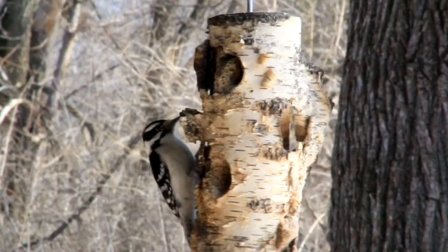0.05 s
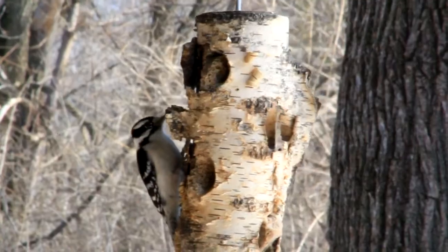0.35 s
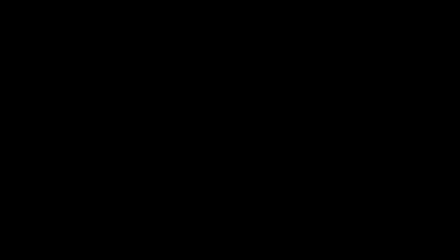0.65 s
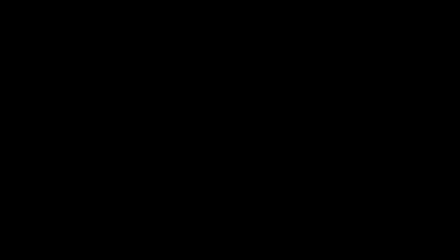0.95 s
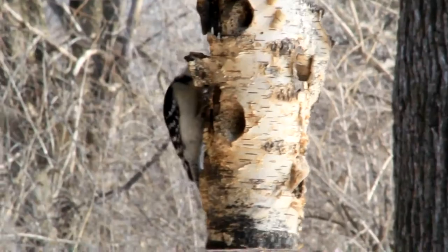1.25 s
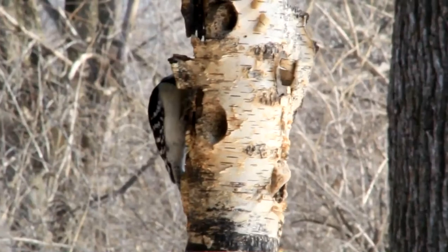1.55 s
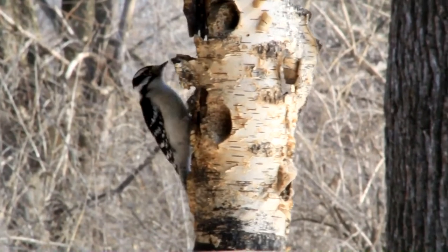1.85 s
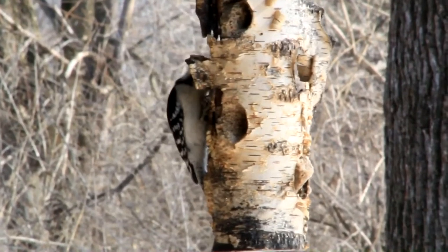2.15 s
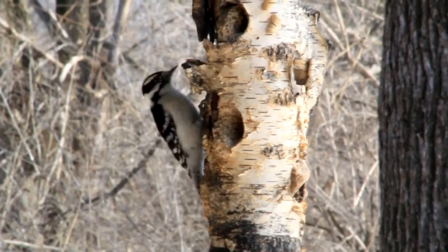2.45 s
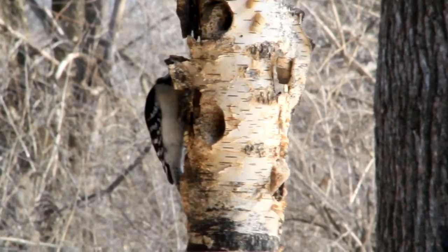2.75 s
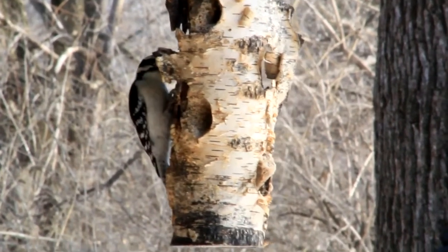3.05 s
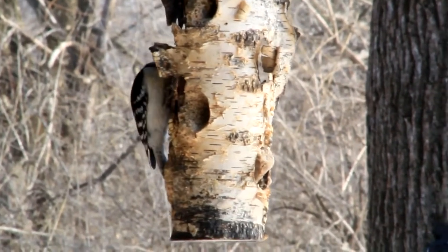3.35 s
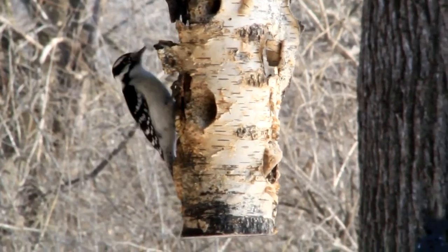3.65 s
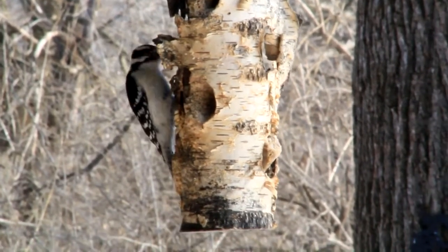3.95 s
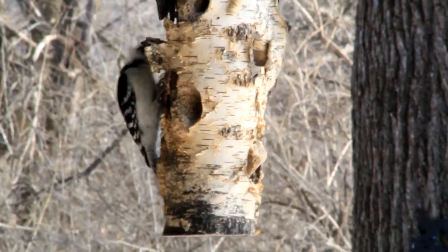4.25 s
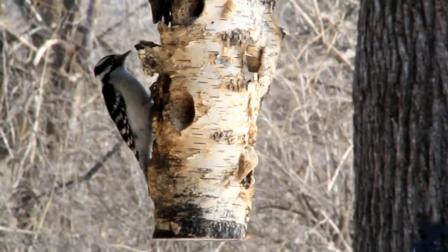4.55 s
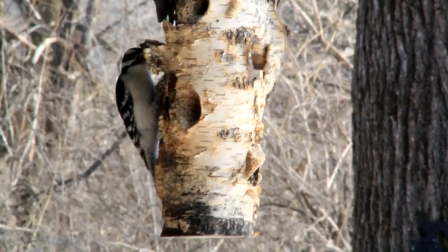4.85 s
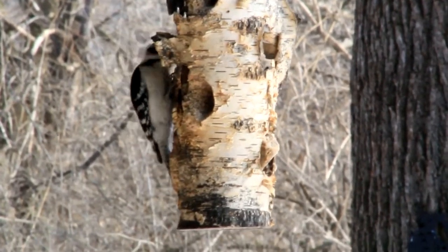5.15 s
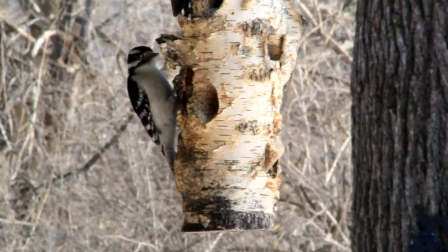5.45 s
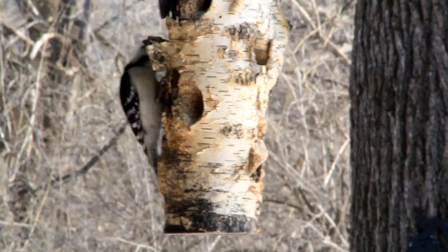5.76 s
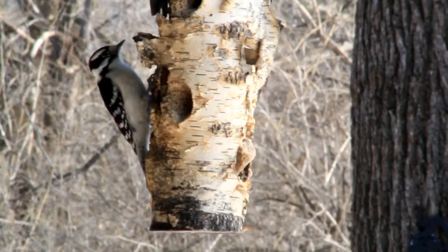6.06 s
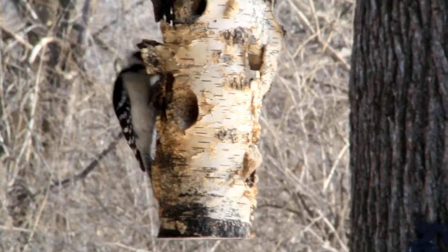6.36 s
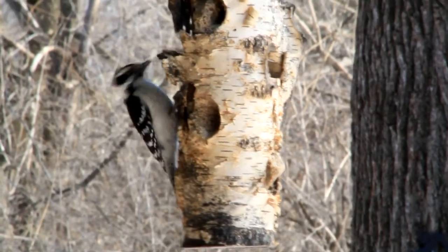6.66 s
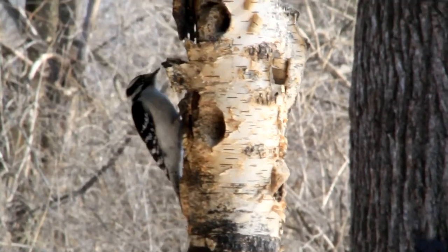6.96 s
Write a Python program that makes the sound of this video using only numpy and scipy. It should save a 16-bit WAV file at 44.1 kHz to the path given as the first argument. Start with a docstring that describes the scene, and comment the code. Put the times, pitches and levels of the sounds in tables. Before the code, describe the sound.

Light, uneven taps and clicks come from a woodpecker working at a birch log outdoors, over a soft, constant hiss of wind and a far rumble. Early on, a faint distant whistle falls and something dry snaps nearby. After a short, dead silence, the ticking and fine patter resume, slightly smeared by close echoes, with occasional soft plinks and one more small snap as the breeze continues.

```python
"""A small woodpecker works at a hanging birch-log feeder in late-winter woods. Crisp ticks and patter
(bits of bark, perhaps drips of meltwater) are each a crack plus a short ring, smeared by close echoes.
A steady breeze hisses in the branches and rustles dry stems over a far rumble. One thin falling whistle,
a few faint plinks and two dry snaps sit on top. Early on, the sound stops dead for 0.6 s."""
import sys
import numpy as np
from scipy import signal
from scipy.fft import rfft, irfft
from scipy.io import wavfile

SR = 44100
rng = np.random.default_rng(int(sys.argv[2]) if len(sys.argv) > 2 else 0)


def put_to_file(sound):
    """Save the sound as 16-bit audio at rate SR, in the file named by the first command-line argument."""
    columns = np.atleast_2d(sound).T  # one column per channel
    safe = np.clip(columns, -1, 1)
    whole_steps = np.round(safe * 32767)
    wavfile.write(sys.argv[1], SR, whole_steps.astype(np.int16))


N = 317961
TIME = np.arange(N) / SR


def from_db(db):
    """Turns decibels into a number to multiply a sound by."""
    return 10 ** (np.asarray(db) / 20)


def rms_one(x):
    """Scales a sound so that its average strength (rms) is 1."""
    return x / np.sqrt(np.mean(x ** 2) + 1e-20)


def in_time(rows):
    """Joins a table's points with straight lines: one curve for each column after the time."""
    times, *columns = np.transpose(rows)
    return [np.interp(TIME, times, column) for column in columns]


def add(out, start_s, sound):
    """Mixes a sound in at the given time."""
    at = int(np.clip(start_s * SR, 0, N - 1))
    out[at:at + len(sound)] += sound[:N - at]


def coloured(noise, spectrum):
    """Makes some pitches of a noise louder than others; the result has strength 1."""
    hz, db = np.transpose(spectrum)
    bins_hz = np.maximum(np.fft.rfftfreq(N, 1 / SR), 1)
    gain = from_db(np.interp(np.log(bins_hz), np.log(hz), db))
    return rms_one(irfft(rfft(noise) * gain, N))


def drift(rate_hz):
    """A smooth random wobble of strength 1; a higher rate wobbles faster."""
    noise = rng.standard_normal(N + SR)
    return rms_one(signal.sosfilt(signal.butter(2, rate_hz, fs=SR, output="sos"), noise)[SR:])


def band(x, hz, octaves):
    """Keeps only the pitches in a band of the given width around hz."""
    half = 2 ** (octaves / 2)
    return signal.sosfilt(signal.butter(2, [hz / half, hz * half], "band", fs=SR, output="sos"), x)


# Tone colour of the far rumble: (pitch [Hz], relative level [dB])
RUMBLE_COLOUR = [(20, -12), (45, -1.5), (70, -5), (130, -0.5), (280, -2), (480, 0.5), (900, -4.5),
                 (2000, -13.5), (16000, -62.5)]
# Tone colour of the air rushing through branches: (pitch [Hz], relative level [dB])
RUSH_COLOUR = [(100, -25), (450, -10), (850, 1.5), (1400, 1.5), (2000, -4.5), (2500, -4.5), (3000, -10.5),
               (3500, -8.5), (6000, -35), (16000, -47.5)]
# Tone colour of the rustling stems: (pitch [Hz], relative level [dB])
RUSTLE_COLOUR = [(1500, -14.5), (3000, 0), (3500, -7.5), (4200, 0.5), (6000, -2), (8500, -6.5),
                 (11000, -11), (13500, -14), (16000, -12.5)]
# How the breeze swells and sinks: (time [s], rush change [dB], rustle change before rustle_share [dB])
BREEZE_SWELLS = [(0.06, 2.5, 6), (0.34, 1.6, -1.3), (1.46, 0.5, 3.7), (1.62, 0.2, 4), (1.82, -0.5, 2),
                 (2.94, 0.25, 2.5), (4.14, -0.7, -1), (4.38, -0.1, 0.8), (4.58, -1, 1.5), (4.74, 0.8, 2.5),
                 (5.1, -2, -3.5), (5.7, 2, 4.5), (5.78, -0.8, -0.5), (6.34, 0.9, 3.3), (6.58, -2.8, -5),
                 (6.74, 2.2, 0), (7.02, -3, 1.5), (7.14, 0.5, 0)]


def breeze(rumble_db=-53.0, rush_db=-49.0, rustle_db=-55.5, rustle_share=0.6,
           sway_db=0.74, sway_hz=5, flutter_db=1.9, flutter_hz=25, grain_db=2.0):
    """Over a steady far rumble, air rushes in branches and rustles dry stems; those two sway together."""
    rush_swell, rustle_swell = in_time(BREEZE_SWELLS)
    sway = sway_db * drift(sway_hz)
    rumble = from_db(rumble_db) * coloured(rng.standard_normal(N), RUMBLE_COLOUR)
    rush = from_db(rush_db + rush_swell + sway) * coloured(rng.standard_normal(N), RUSH_COLOUR)
    grains = rng.standard_normal(N) * from_db(grain_db * rng.standard_normal(N))
    flutter = flutter_db * drift(flutter_hz)
    rustle_level = from_db(rustle_db + rustle_share * rustle_swell + sway + flutter)
    rustle = rustle_level * coloured(grains, RUSTLE_COLOUR)
    return rumble + rush + rustle


def burst(rise_s, crack_db, crack_s, early_s=0.022, early_fall_db=4.5, tail_s=0.24, grain_db=6.0):
    """A brief crackle and its close echoes, which fade faster once early_s has passed."""
    t = np.arange(SR // 8) / SR
    tail_db = -60 * np.maximum(t - early_s, 0) / tail_s
    echoes = from_db(tail_db - early_fall_db * t / early_s)
    crack = from_db(crack_db) * np.exp(-t / crack_s)
    loudness = (1 - np.exp(-t / rise_s)) * (echoes + crack)
    grains = rng.standard_normal(len(t)) * from_db(grain_db * rng.standard_normal(len(t)))
    return loudness * grains


def tick(crack_db, ring_db, hz, octaves, low_hz=800, high_hz=7000, split_hz=4000, edge_db=-4.0):
    """One small thing is struck: a noisy crack plus its own short ring."""
    # the bright edge comes at once, the woody body builds up behind it
    edge = burst(rise_s=0.00088, crack_db=5.5, crack_s=0.0037)
    edge = signal.lfilter(*signal.butter(2, split_hz, "high", fs=SR), edge)
    body = burst(rise_s=0.009, crack_db=-12.0, crack_s=0.011)
    body = signal.lfilter(*signal.butter(2, split_hz, fs=SR), body)
    soften = signal.butter(1, [low_hz, high_hz], "band", fs=SR)
    crack = signal.lfilter(*soften, body + from_db(edge_db) * edge)
    crack = signal.lfilter(*soften, crack)
    ring = band(burst(rise_s=0.0017, crack_db=2.5, crack_s=0.00598), hz, octaves)
    head = SR // 36   # the first 28 ms set the level
    return from_db(crack_db) * crack / np.std(crack[:head]) + from_db(ring_db) * ring / np.std(ring[:head])


# Woody knocks ring over a wide band, small high ticks a narrow one: (pitch [Hz], width [octaves])
RING_WIDTHS = [(1000, 1.03), (2700, 2.06), (4500, 0.62), (9000, 0.5)]
# The louder ticks, before the gains below: (time [s], crack level [dB], ring level [dB], pitch [Hz])
FEEDER_TICKS = [(0.015, -46, -53, 9800), (0.064, -47, -51, 5560), (0.114, -49, -47, 1410),
                (0.191, -45, -45, 4450), (0.472, -44, -52, 5100), (0.561, -47, -55, 6500),
                (0.614, -54, -53, 5400), (1.258, -62, -47.5, 7200), (1.318, -58, -54, 1600),
                (1.358, -54, -54.5, 9000), (1.539, -42, -52.5, 6340), (1.633, -50, -51, 1200),
                (1.785, -49.5, -53.5, 1400), (1.955, -48, -46.5, 3270), (2.165, -51, -45, 4770),
                (2.265, -44.5, -53, 1800), (2.366, -45, -46.5, 2620), (2.539, -50, -45.5, 1050),
                (2.598, -53, -48.5, 6300), (2.609, -43.5, -54, 5670), (2.72, -57, -46.5, 2450),
                (2.827, -57, -52, 6100), (2.871, -46, -45.5, 1000), (2.902, -44.5, -44.5, 5600),
                (2.958, -46, -49, 5900), (3.019, -58, -53.5, 6700), (3.117, -46.5, -48.5, 980),
                (3.18, -47, -57, 5430), (3.264, -55, -49, 1650), (3.349, -49, -58, 4900),
                (3.394, -49.5, -58, 8900), (3.911, -55, -44.5, 2750), (4.02, -46, -53, 925),
                (4.214, -48, -48.5, 850), (4.306, -62, -48.5, 1710), (4.374, -46.5, -48.5, 2620),
                (4.43, -40.5, -49.5, 1590), (4.657, -46.5, -53, 4900), (4.742, -60, -55, 8200),
                (4.821, -45, -47, 6640), (4.926, -46, -56, 900), (5.017, -50, -61, 11000),
                (5.041, -48.5, -49, 1770), (5.161, -50, -49, 5600), (5.192, -50, -53.5, 7400),
                (5.233, -49, -50, 1700), (5.272, -47.5, -58, 9400), (5.406, -52, -48.5, 1980),
                (5.48, -62, -60, 10000), (5.604, -44, -46.5, 2760), (5.699, -49, -50, 6700),
                (5.838, -50, -57, 9000), (6.171, -46.5, -54, 2800), (6.376, -49, -51, 7560),
                (6.467, -45, -57, 3100), (6.636, -62, -54, 8450), (6.675, -58, -53, 900),
                (6.856, -51, -56, 4630), (7.071, -48, -50.5, 8500)]


def ticks(crack_gain_db=-3.5, ring_gain_db=1.5):
    """The clear ticks as the woodpecker works; each one's pitch sets how wide its ring is."""
    out = np.zeros(N)
    pitches, widths = np.transpose(RING_WIDTHS)
    for start_s, crack_db, ring_db, hz in FEEDER_TICKS:
        octaves = np.interp(np.log(hz), np.log(pitches), widths)
        add(out, start_s, tick(crack_db + crack_gain_db, ring_db + ring_gain_db, hz, octaves))
    return out


def patter(softest_db=-62.0, spread_db=4.5, low_hz=1700, high_hz=11500, db_per_octave=-1.5, count=95):
    """Bits of bark or drips tick faintly, with no long pauses; higher ones are smaller and ring less."""
    out = np.zeros(N)
    middle_hz = np.sqrt(low_hz * high_hz)
    for slot, (when, pitch, size) in enumerate(rng.random((count, 3))):
        start_s = (slot + when) / count * N / SR
        hz = low_hz * (high_hz / low_hz) ** pitch
        crack_db = softest_db + spread_db * size
        ring_db = crack_db + db_per_octave * np.log2(hz / middle_hz)
        add(out, start_s, tick(crack_db, ring_db, hz, octaves=0.6))
    return out


def close_echoes(x, total_db=-7.5, earliest_s=0.004, latest_s=0.02, count=14):
    """Nearby surfaces send back weak copies, making the sound hollow but no louder."""
    out = x.copy()
    for distance, side in rng.random((count, 2)):
        delay_s = earliest_s + distance * (latest_s - earliest_s)
        gain = np.sign(side - 0.5) * from_db(total_db) / np.sqrt(count)
        add(out, delay_s, gain * x)
    return out / np.sqrt(1 + from_db(2 * total_db))


# Where the surroundings ring before the silence: (pitch [Hz], width [Hz], gain of the added ring [dB])
EARLY_RINGS = [(290.6, 37, 5.5), (1363, 28, -3), (1580, 20, 4.5), (1870, 46, -5.5), (2780, 140, -4.5),
               (2940, 99, -0.5), (4670, 66, -14.5), (5150, 180, -2.5), (5460, 60, 1)]
# Where they ring after the silence: (pitch [Hz], width [Hz], gain of the added ring [dB])
LATE_RINGS = [(47.3, 10, -17), (126, 12, -11), (222, 29, -1), (277, 21, -2), (417, 34, -10), (618, 32, -4),
              (882, 47, -7), (1100, 28, -9), (1218, 69, -7.5), (1684, 17, -1), (1593, 22, 2.5),
              (1829, 25, 7), (1939, 59, 3.5), (2090, 14, 4.5), (2360, 23, 0), (2640, 12, 3), (2793, 58, 0),
              (2987, 43, 3.5), (3090, 14, 2.5), (4020, 100, -4.5), (4900, 87, -14)]


def surroundings(x, rings):
    """A sound sets its surroundings ringing at certain pitches, which add to it."""
    out = x.copy()
    for hz, width_hz, db in rings:
        out += from_db(db) * signal.lfilter(*signal.iirpeak(hz, hz / width_hz, fs=SR), x)
    return out


# The path of the thin, far whistle: (time [s], pitch [Hz], level [dB])
WHISTLE_PATH = [(.20, 5500, -67), (.225, 5100, -53.5), (.28, 4740, -56), (.315, 5320, -66.5),
                (.345, 4700, -55.5), (.375, 4080, -52.5), (.40, 3900, -73.5)]


def whistle(blur_hz=380):
    """A falling whistle, blurred into a narrow hiss on its way through the trees."""
    hz, db = in_time(WHISTLE_PATH)
    phase = 2 * np.pi * np.cumsum(hz) / SR
    sounding = (TIME > WHISTLE_PATH[0][0]) & (TIME < WHISTLE_PATH[-1][0])
    blurred_tone = drift(blur_hz) * np.cos(phase) + drift(blur_hz) * np.sin(phase)
    return sounding * from_db(db) * blurred_tone


# Faint plinks and far peeps, before the gain below: (time [s], level [dB], pitch [Hz])
PLINK_NOTES = [(0.269, -56, 3080), (0.34, -49.5, 1350), (1.66, -45, 2020), (2.372, -46.5, 2010),
               (4.02, -54, 905), (4.477, -51, 626), (5.22, -53, 1300), (5.591, -51, 1336),
               (5.695, -52, 625), (6.68, -54, 840)]


def plinks(gain_db=-0.5, peak_s=0.031, length_s=0.186, blur_hz=22, blur=0.7):
    """Short soft tones swell and fade, wavering because they arrive by many paths."""
    out = np.zeros(N)
    # complex numbers let one curve wobble both a tone's strength and its timing
    wobble = drift(blur_hz) + 1j * drift(blur_hz)
    paths = (1 + blur * wobble) / np.sqrt(1 + 2 * blur ** 2)
    t = np.arange(int(length_s * SR)) / SR
    age = t / peak_s
    swell = age ** 2 * np.exp(2 - 2 * age)
    for start_s, db, hz in PLINK_NOTES:
        waver = np.interp(start_s + t, TIME, paths)
        tone = np.sqrt(2) * np.real(np.exp(2j * np.pi * hz * t) * waver)
        add(out, start_s, from_db(db + gain_db) * swell * tone)
    return out


# Dry snaps close by: (time [s], level before the gain below [dB], pitch [Hz])
DRY_SNAPS = [(.381, -46.5, 7400), (2.96, -41, 6440)]


def snaps(gain=2, decay_s=0.0019, octaves=0.48):
    """Quick clicks of noise, too close to be smeared by echoes."""
    out = np.zeros(N)
    t = np.arange(SR // 50) / SR
    for start_s, db, hz in DRY_SNAPS:
        noise = rms_one(band(rng.standard_normal(len(t)), hz, octaves))
        add(out, start_s, gain * from_db(db) * noise * np.exp(-t / decay_s))
    return out


def scene():
    """Breeze, ticks and patter ring in the same surroundings; the tones and snaps are added on top."""
    woods = breeze() + close_echoes(ticks() + patter())
    early = TIME < HEARD_SPANS[1][0]
    woods = np.where(early, surroundings(woods, EARLY_RINGS), surroundings(woods, LATE_RINGS))
    return (woods + plinks() + whistle() + snaps())[None]


# When the sound is heard, with silence in between: (start [s], end [s])
HEARD_SPANS = [(0, 0.628), (1.228, 7.3)]


def record(dry, dull_hz=13500, cutoff_hz=15850):
    """The microphone softens the treble; the sound stops dead once, and its very top is cut off."""
    soft = signal.sosfilt(signal.butter(1, dull_hz, fs=SR, output="sos"), dry)
    heard = sum((TIME >= start) & (TIME < end) for start, end in HEARD_SPANS)
    top_cut = signal.ellip(12, 0.1, 70, cutoff_hz, fs=SR, output="sos")
    return signal.sosfilt(top_cut, soft * heard)


dry = scene()
out = record(dry)
put_to_file(out)
```